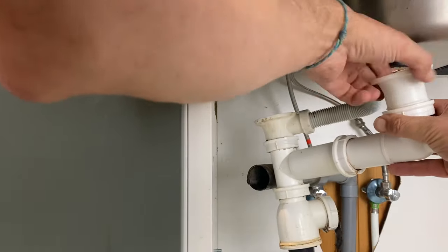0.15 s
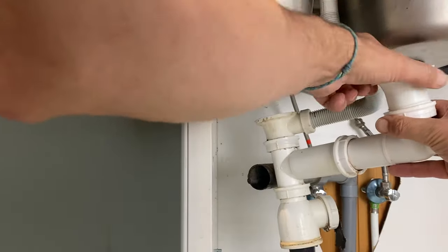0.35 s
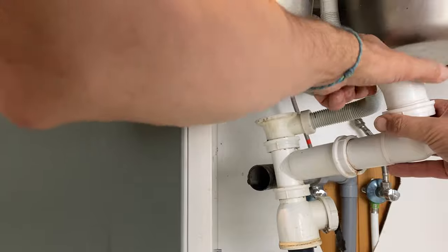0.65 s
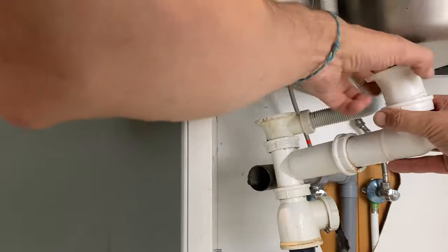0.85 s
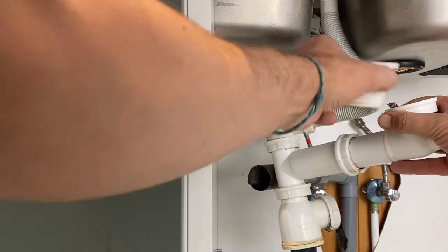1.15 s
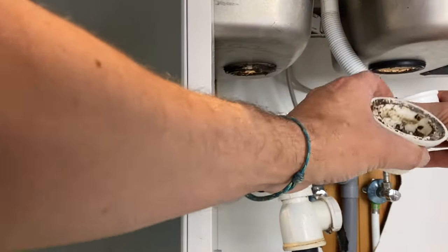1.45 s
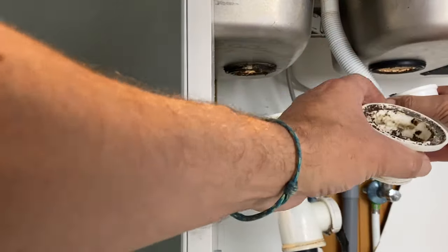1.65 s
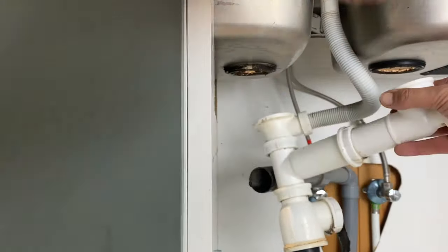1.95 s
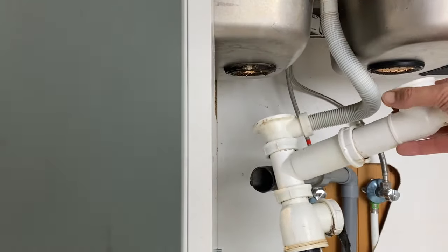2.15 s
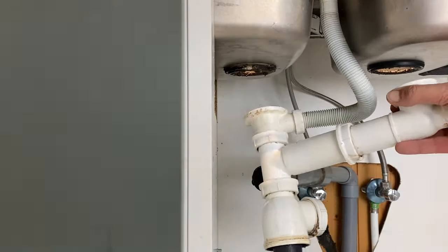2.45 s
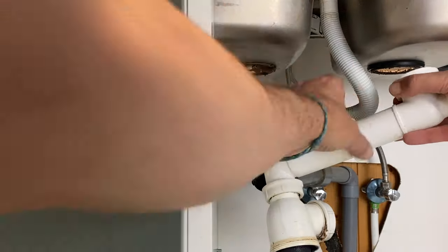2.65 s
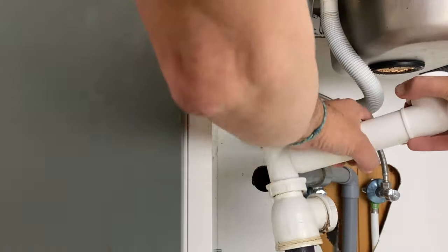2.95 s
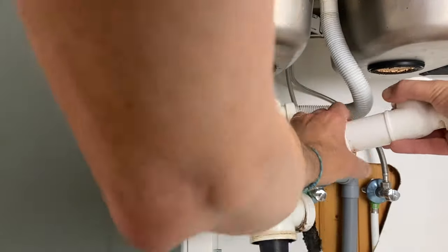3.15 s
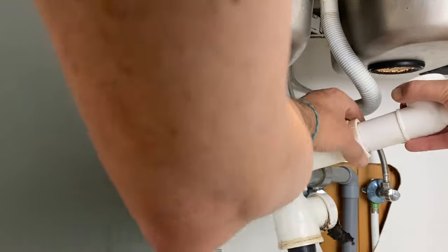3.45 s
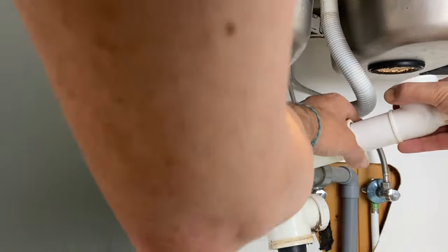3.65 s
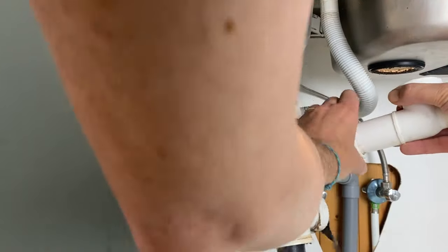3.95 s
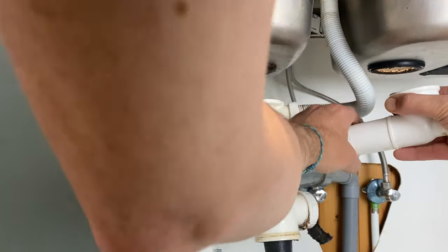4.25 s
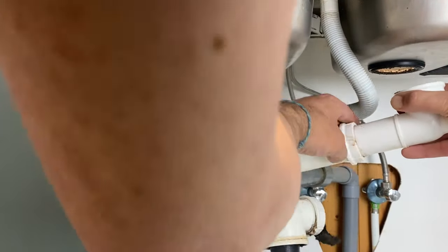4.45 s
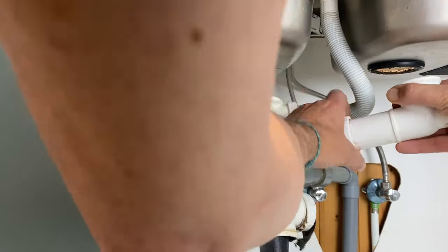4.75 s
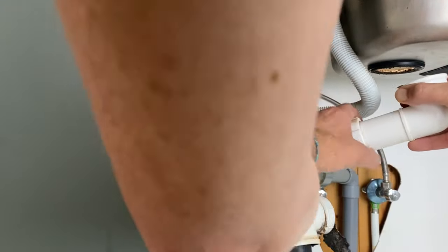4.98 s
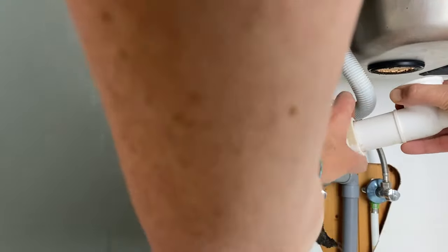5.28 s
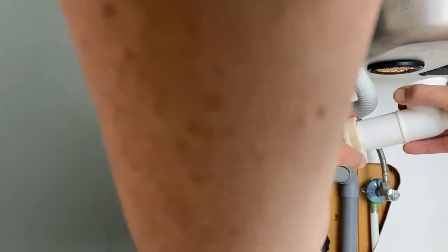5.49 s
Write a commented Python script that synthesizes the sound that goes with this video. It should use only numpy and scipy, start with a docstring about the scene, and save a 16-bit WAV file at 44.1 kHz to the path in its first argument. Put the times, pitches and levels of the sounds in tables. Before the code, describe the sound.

Close up inside a kitchen sink cabinet, hands tug at a hollow plastic pipe joint with dry scrapes, ticks and low thuds. It snaps free with a loud ringing crack just before one second. After softer handling, the loose piece drops slightly further off and clatters quickly to rest. Then a plastic nut is twisted in short, gritty, clicking strokes over faint room noise.

```python
"""Plastic sink pipes taken apart by hand

Close to the phone, inside a kitchen sink cabinet, a joint snaps free; the loose drain piece is then dropped
and clatters to rest, and a coupling nut is twisted. Snap and drop are noisy cracks with ringing wall modes.
Threads tick as damped rings with chatter, joint and nut scrape as trains of tiny slips, skin hisses and
rustles, and the pipework thuds at low pitch. The cabinet adds a dense tail over a quiet room noise."""
import sys
import numpy as np
from scipy import signal
from scipy.fft import rfft, irfft
from scipy.io import wavfile

SR = 44100
rng = np.random.default_rng(int(sys.argv[2]) if len(sys.argv) > 2 else 0)


def log_audio(samples):
    """Write samples as a 16-bit WAV file to the path given in sys.argv[1]."""
    # one column per channel
    frames = np.atleast_2d(samples).T
    # limit to full scale, then quantise
    limited = np.clip(frames, -1, 1)
    pcm = np.round(limited * 32767).astype(np.int16)
    wavfile.write(sys.argv[1], SR, pcm)


N = 247842  # length in samples


def undb(db):
    """Decibels to gain."""
    return 10 ** (np.asarray(db) / 20)


def unit(x):
    """Scale to rms 1."""
    return x / np.sqrt(np.mean(x ** 2) + 1e-30)


def read(points, hz):
    """Value of a (Hz, value) table on a log-frequency axis."""
    f, v = np.transpose(points)
    return np.interp(np.log(np.maximum(hz, 1)), np.log(f), v)


def colour(x, spectrum, tilt=0, size=2048):
    """Minimum-phase filter with the spectrum's shape, tilted in dB per octave about 1 kHz (flat below 250 Hz)."""
    hz = np.arange(size // 2 + 1) * SR / size
    shape = unit(undb(read(spectrum, hz)))
    gain = shape * undb(tilt * np.log2(np.maximum(hz, 250) / 1000))
    # folding the cepstrum makes the filter causal
    cepstrum = irfft(np.log(gain))
    cepstrum[1:size // 2] *= 2
    cepstrum[size // 2 + 1:] = 0
    impulse = irfft(np.exp(rfft(cepstrum)))
    return signal.fftconvolve(x, impulse)[:len(x)]


def band(x, lo_hz, hi_hz, order=2):
    """Band-pass filter."""
    return signal.sosfilt(signal.butter(order, [lo_hz, hi_hz], "band", fs=SR, output="sos"), x)


def fade(t, t60):
    """Exponential decay by 60 dB in t60 seconds."""
    return np.exp(-np.log(1000) * t / t60)


def add(out, s, sound):
    """Mix a sound in at time s."""
    i = int(s * SR)
    out[i:i + len(sound)] += sound[:N - i]


def cabinet(x, wet_db, treble_db, gap_s=0.0052):
    """Close panels return a dense tail within milliseconds, each band with its own decay, the treble weaker."""
    # Each row: frequency in Hz, decay time of the tail (60 dB) in seconds.
    tail_t60 = [(150, 0.45), (500, 0.11), (1000, 0.38), (2500, 0.21), (6000, 0.22), (14000, 0.29)]
    t = np.arange(SR // 2) / SR
    edges = np.geomspace(60, 18000, 12)
    tail = np.zeros(len(t))
    for lo, hi in zip(edges, edges[1:]):
        hz = np.sqrt(lo * hi)
        gain = undb(read([(2500, 0.012), (10000, treble_db)], hz))
        noise = band(rng.standard_normal(len(t)), lo, hi, order=3)
        tail += gain * noise * fade(t, read(tail_t60, hz))
    tail = unit(tail * (t > gap_s)) / np.sqrt(len(t))  # total energy 1
    return x + undb(wet_db) * signal.fftconvolve(x, tail)[:N]


def kitchen(level_db):
    """Quiet room rumble and hiss: steady noise of a fixed colour."""
    # Each row: frequency in Hz, relative density in dB per Hz.
    room_spectrum = [(25, -13), (66, -27.5), (100, -14), (140, -9.5), (220, 0), (340, 0.5), (500, -3),
                     (700, -7.5), (1000, -10.5), (1400, -8), (2000, -14), (3000, -16), (7000, -18.5),
                     (15500, -21.5)]
    return undb(level_db) * unit(colour(rng.standard_normal(N), room_spectrum))


def slips(spectrum, per_s, scatter_db):
    """Dry friction: tiny slips of uneven size that come in spurts, heard through the pipe wall."""
    spurts = unit(band(rng.standard_normal(N), 9.5, 33))
    kicks = (rng.random(N) < per_s / SR) * rng.choice([-1, 1], N)
    scatter = scatter_db * np.clip(rng.standard_normal(N), -2, 2)
    size_db = scatter + 2.5 * np.clip(spurts, -2, 2)
    return unit(colour(kicks * undb(size_db), spectrum))


def effort(pushes, peak_share=0.4, roundness=0.55):
    """Force of the hand over time: each push swells to its peak and eases off."""
    t = np.arange(N) / SR
    force = np.zeros(N)
    for s, length, db in pushes:
        ramp = np.interp(t, [s, s + peak_share * length, s + length], [0, 1, 0])
        # a lower roundness gives a flatter top
        force += undb(db) * np.sin(np.pi / 2 * ramp) ** roundness
    return force


def sliding(rise_share, fall_share):
    """Speed of the fingers over time: each slide to a new grip picks up quickly and dies away."""
    # Each row: moment of the peak in seconds, relative hiss level in dB, length scale in seconds.
    slides = [(0.053, -58.5, 0.0078), (0.585, -66, .05), (0.739, -61, 0.021), (1.021, -52.5, 0.0183),
              (2.78, -64, 0.16), (2.93, -66, 0.022), (3.028, -56, 0.054), (3.142, -65.5, 0.045),
              (3.246, -64, .05), (3.475, -64.5, .04), (3.577, -60, 0.011), (3.702, -62, 0.07),
              (3.92, -62.5, 0.075), (4.096, -59, 0.037), (4.28, -67.5, 0.14), (4.481, -65, 0.028),
              (4.645, -56.5, 0.021), (4.884, -62.5, 0.029), (5.05, -62.5, 0.033), (5.258, -60.5, 0.044),
              (5.552, -58, 0.021)]
    t = np.arange(N) / SR
    speed = np.zeros(N)
    for s, db, length in slides:
        distance = np.maximum((s - t) / rise_share, (t - s) / fall_share)
        speed += undb(db) * np.exp(-distance / length)
    return speed


def handling(scrape_db, grind_db, skin_db, hold_db, grip_db, drag_db, rustle_db):
    """The joint scrapes, the nut grinds, skin hisses and rustles, and the held pipe creaks faintly throughout."""
    # Tugs work the joint loose; the last two rows are faint soft swishes after it. Each row: start in seconds,
    # length in seconds, relative scraping level in dB.
    tugs = [(0.045, 0.056, -54.5), (0.14, 0.088, -58), (0.235, 0.32, -57), (0.63, .22, -63.5),
            (1.48, 0.22, -61.5), (2.0, .27, -64)]
    # Strokes twist the nut. Each row: start in seconds, length in seconds, relative grinding level in dB.
    strokes = [(2.52, 0.46, -60.5), (2.99, 0.13, -59), (3.26, .28, -57.5), (3.57, 0.14, -59.5),
               (3.86, 0.29, -59.5), (4.32, 0.38, -59), (4.77, 0.4, -61), (5.35, 0.25, -61)]
    # Colours of joint, nut threads and skin. Each row: frequency in Hz, relative density in dB per Hz.
    scrape_spectrum = [(80, -14.5), (140, 4), (300, -3.5), (700, 4), (1400, 4), (2300, -9.5), (4200, -7.5),
                       (6500, -19), (15500, -16.5)]
    grind_spectrum = [(200, -32.5), (450, -12.5), (700, -6), (830, 7.5), (1050, -3.5), (1400, -2.5),
                      (2300, -11), (4500, -19.5), (7000, -29)]
    skin_spectrum = [(2000, -4), (4000, -10.5), (6000, -11), (8500, -2), (11000, -5), (13500, -0.5),
                     (16000, -9.5)]

    tug, twist = effort(tugs), effort(strokes)
    slide = sliding(rise_share=0.43, fall_share=0.47)
    scrape = tug * undb(scrape_db) * slips(scrape_spectrum, per_s=1100, scatter_db=1.5)
    grind_force = twist * undb(grind_db) + undb(hold_db)
    grind = grind_force * slips(grind_spectrum, per_s=450, scatter_db=3.0)
    skin_force = slide * undb(skin_db) + twist * undb(grip_db) + tug * undb(drag_db)
    skin = skin_force * slips(skin_spectrum, per_s=7700, scatter_db=0.5)
    rustle = slide * undb(rustle_db) * unit(band(rng.standard_normal(N), 1900, 4400))
    return scrape + grind + skin + rustle


def faint_ticks(scatter_db, octaves, count=60):
    """Lesser slips at random moments, each with its own strength and pitch."""
    per_s, middle_db, middle_hz = 4, -53.5, 995
    edge_db, chatter_t60 = -15, 0.04
    wait, size, pitch = rng.random((count, 3)).T
    times = np.cumsum(-np.log(1 - wait)) / per_s
    return [(s, middle_db + scatter_db * a, middle_hz * 2 ** (octaves * b), edge_db, chatter_t60)
            for s, a, b in zip(times, 2 * size - 1, 2 * pitch - 1) if s < N / SR]


def ticks(level_db, edge_db, ring_t60, chatter_db, spread):
    """A slip kicks the hand-damped pipe wall, and the thread chatters for a moment after it."""
    # Threads and seals slip. Each row: start in seconds, relative level in dB, ring in Hz,
    # relative level of the sharp edge in dB, chatter decay time (60 dB) in seconds.
    main_ticks = [(0.056, -39.5, 1290, -38, 0.062), (0.151, -42, 1280, -9.5, 0.047),
                  (0.288, -49.5, 1404, -21, .17), (0.466, -37, 1330, -10, .033),
                  (0.641, -47.5, 1060, -7, .046), (0.719, -47.5, 1950, -20, 0.044),
                  (0.793, -43, 1430, -17, 0.041), (1.084, -48.5, 830, -13.5, 0.13),
                  (1.108, -47.5, 800, -18.5, 0.086), (1.238, -50, 740, -13.5, 0.073),
                  (1.756, -53, 850, -8, .05), (1.859, -49, 866, -10, .045), (1.941, -50, 770, -12.5, 0.16),
                  (2.051, -52, 760, -11.5, 0.31), (2.146, -49, 780, -15, .15),
                  (2.243, -46.5, 840, -13, 0.053), (2.846, -43.5, 1100, -32, 0.11),
                  (2.917, -41, 1120, -39, 0.084), (3.022, -47, 800, -18, 0.088),
                  (3.042, -44, 820, -15, 0.071), (3.102, -43.5, 940, -14, 0.049),
                  (3.354, -49.5, 880, -11, 0.14), (3.425, -41.5, 1150, -35, 0.075),
                  (3.57, -43.5, 865, -16.5, 0.083), (3.652, -33.7, 1180, -44.5, .07),
                  (3.806, -47.5, 922, -24, 0.045), (3.873, -42.5, 1240, -34, .052),
                  (3.972, -47, 860, -21, 0.085), (4.059, -46.5, 810, -10, 0.17),
                  (4.186, -44.5, 1330, -13, 0.032), (4.319, -42.5, 1340, -21, 0.035),
                  (4.476, -44.5, 1140, -12, 0.073), (4.598, -50.5, 820, -7, 0.057),
                  (4.956, -44.5, 1160, -35, 0.025), (5.139, -49, 870, -32, 0.038),
                  (5.244, -47.5, 893, -11.5, 0.067)]
    out, t = np.zeros(N), np.arange(SR // 8) / SR
    for s, db, hz, sharp_db, chatter_t60 in main_ticks + faint_ticks(scatter_db=6.5, octaves=0.94):
        chatter = rng.standard_normal(len(t)) * fade(t, chatter_t60)
        knock = np.sin(2 * np.pi * hz * t) * fade(t, ring_t60)
        knock += undb(chatter_db) * band(chatter, hz / (1 + spread), hz * (1 + spread))
        edge = band(rng.standard_normal(len(t)) * fade(t, 0.6 * chatter_t60), 1600, 3100)
        tick = knock / abs(knock).max() + undb(sharp_db + edge_db) * edge
        add(out, s, undb(db + level_db) * tick)
    return out


def bumps(level_db, t60, rise_s, spread):
    """Soft pushes shake the hanging pipework in its mounts, which thuds briefly."""
    # Each row: start in seconds, relative level in dB, ring in Hz.
    pushes = [(0.067, -45.5, 244.6), (0.21, -47.5, 238), (3.032, -53, 231), (3.693, -54.5, 234),
              (3.923, -55, 255), (4.067, -49.5, 309)]
    out, t = np.zeros(N), np.arange(SR // 4) / SR
    for s, db, hz in pushes:
        shudder = unit(band(rng.standard_normal(len(t)), hz / (1 + spread), hz * (1 + spread)))
        thud = np.sin(2 * np.pi * hz * t) + 0.25 * shudder
        add(out, s, undb(db + level_db) * thud * fade(t, t60) * (1 - fade(t, rise_s)))
    return out


def knocks(blows, modes, crack, ring_db, crack_db, crack_t60, click_db, edge_db, edge_t60,
           scatter_db, wet_db, treble_db):
    """Blows on a plastic shell: a hard contact click, a crack of crowded wall modes, and a few lasting rings."""
    cracks, rings, t = np.zeros(N), np.zeros(N), np.arange(SR // 2) / SR
    hz, db, t60 = np.transpose(modes)
    decay = fade(t, t60[:, None]) * (1 - fade(t, 0.022))  # with a soft onset
    shapes = np.sin(2 * np.pi * hz[:, None] * t) * decay
    # neighbouring modes move the struck point in opposite directions
    signs = (-1) ** np.arange(len(hz))
    for s, level_db, tilt in blows:
        # each point of contact favours other modes
        scatter = scatter_db * rng.standard_normal(len(hz))
        size = undb(db + scatter + tilt * np.log2(hz / 1000))
        add(rings, s, undb(level_db + ring_db) * (signs * size) @ shapes)
        push = rng.standard_normal(len(t)) * fade(t, crack_t60)
        push[0] -= undb(click_db)  # the click of contact
        body = undb(crack_db) * colour(push, crack, tilt)
        edge = band(rng.standard_normal(len(t)) * fade(t, edge_t60), 8980, 11000) * undb(2.8 * tilt)
        add(cracks, s, undb(level_db) * (body + undb(edge_db) * edge))
    # thin shells radiate little bass
    return band(rings + cabinet(cracks, wet_db, treble_db), 140, 21000)


def joint_snap():
    """The joint lets go close by, in two blows that crack and ring the pipe wall."""
    # Each row: start in seconds, relative level in dB, brightness in dB per octave.
    snaps = [(0.8580, -48.5, 1.5), (0.8866, -22, 1)]
    # Rings of the pipe. Each row: frequency in Hz, relative level in dB, decay time (60 dB) in seconds.
    pipe_modes = [(226.6, -5, 0.29), (278.7, 3.5, .14), (467, 1.5, 0.15), (563, -7, 0.18), (772, -4, 0.2),
                  (918, -5, 0.14), (904, 2, 0.094), (1068, -17.5, 0.091), (1487, 7.5, 0.084),
                  (1694, 2.5, 0.083), (1833.4, 1, 0.1), (2190, -20.5, 0.1), (2500, -7, 0.1),
                  (2670, -2, 0.083), (3820, -18, .11)]
    # Colour of the pipe's crack. Each row: frequency in Hz, relative density in dB per Hz.
    pipe_crack = [(60, -36), (130, -28), (230, 0.5), (370, -6), (530, 4.5), (700, -4.5), (950, 3),
                  (1230, -9.5), (1600, -4.5), (3100, -6), (4400, -15.5), (5600, -30), (7500, -32.5),
                  (15500, -25)]
    return knocks(snaps, pipe_modes, pipe_crack, ring_db=-14, crack_db=-3.0, crack_t60=0.095, click_db=19.5,
                  edge_db=-6.5, edge_t60=0.022, scatter_db=0.5, wet_db=-13, treble_db=-5)


def rocking(count=5):
    """The dropped piece rocks on its rim: after each landing, contacts come further apart, weaker and duller."""
    # Each row: start in seconds, relative level in dB, brightness in dB per octave,
    # first rocking gap in seconds, loss per contact in dB.
    landings = [(2.3146, -13, 1, .00424, 2.5), (2.3680, -23, -0.3, .0078, 5.5),
                (2.4465, -35, -1.2, .0125, 11), (2.4620, -34.5, -1.7, .0098, 9),
                (2.5020, -28.6, -1.2, .0138, 8.5)]
    slowing = 1.37  # power law by which the gaps widen
    dulling_db = 0.96  # dB per octave of brightness lost at each contact
    return [(s + gap * k ** slowing, db - loss_db * k, tilt - dulling_db * k)
            for s, db, tilt, gap, loss_db in landings for k in range(count)]


def piece_drop():
    """The drain piece lands further off and clatters, each contact cracking and ringing its shell."""
    # Rings of the piece. Each row: frequency in Hz, relative level in dB, decay time (60 dB) in seconds.
    piece_modes = [(407, -7, 0.11), (471, 2, 0.13), (460, -28, 0.075), (510, -15.5, 0.2), (660, -10, 0.085),
                   (743, 3.5, 0.12), (892, 4.5, 0.24), (1020, -29, 0.098), (966, 10.5, 0.13),
                   (1145, -22, 0.13), (1310, 3, 0.14), (1354, -10, 0.1), (1381, 6.5, 0.12),
                   (1430, -7.5, 0.3), (1774, 2.5, 0.12), (1854, -16, 0.24), (2100, -7.5, 0.21),
                   (2175, 1.5, 0.13), (2280, -12.5, 0.36), (2315, -15, 0.17), (3300, -9, .13),
                   (3670, -16, 0.11), (3880, -15.5, 0.087)]
    # Colour of the piece's crack. Each row: frequency in Hz, relative density in dB per Hz.
    piece_crack = [(90, -31), (200, -12.5), (300, -4), (400, -9.5), (500, 10), (700, -4), (950, -2.5),
                   (1400, -5), (2100, -5), (3000, -9.5), (4200, -11), (6000, -17), (8000, -24.5),
                   (15500, -35.5)]
    return knocks(rocking(), piece_modes, piece_crack, ring_db=-15.5, crack_db=-3.5, crack_t60=0.051,
                  click_db=15.5, edge_db=-27.5, edge_t60=0.022, scatter_db=1.5, wet_db=-5, treble_db=-2.5)


def scene():
    """The hand work happens close by; the dropped piece lands further off, with more of the cabinet in it."""
    hands = handling(scrape_db=-2.5, grind_db=-5.5, skin_db=-0.5, hold_db=-80.5,
                     grip_db=-16.5, drag_db=-16, rustle_db=-11.5)
    hands += ticks(level_db=-1, edge_db=11, ring_t60=0.02, chatter_db=14.0, spread=0.43)
    hands += bumps(level_db=1.0, t60=0.1, rise_s=0.0135, spread=0.86)
    close_work = cabinet(hands, wet_db=-14.5, treble_db=-10)
    return (kitchen(level_db=-65) + close_work + joint_snap() + piece_drop())[None]


def record(dry):
    """The phone's microphone cuts the top steeply above 15.9 kHz."""
    return signal.sosfilt(signal.ellip(10, 0.2, 80, 15900, fs=SR, output="sos"), dry)


dry = scene()
out = record(dry)
log_audio(out)
```